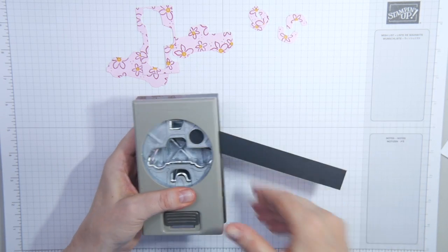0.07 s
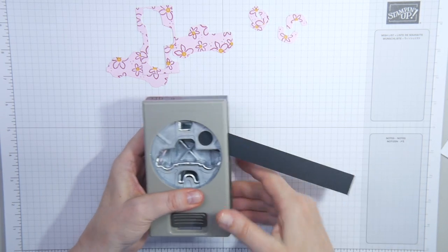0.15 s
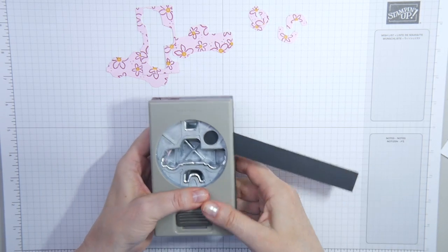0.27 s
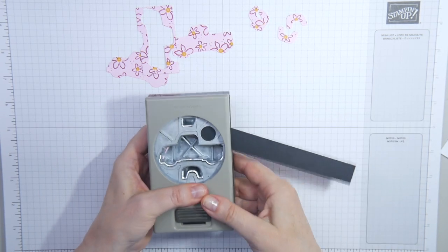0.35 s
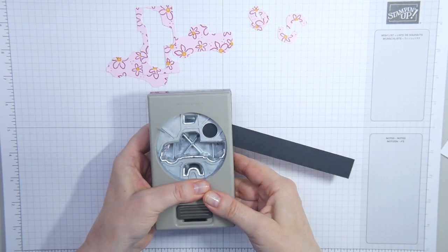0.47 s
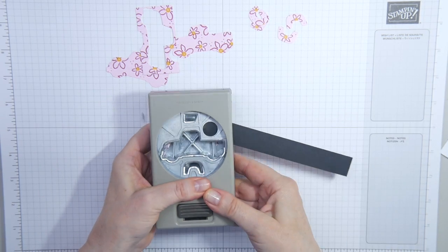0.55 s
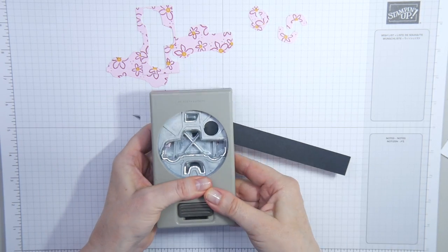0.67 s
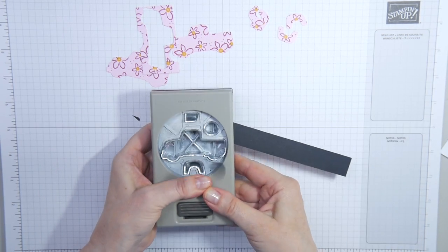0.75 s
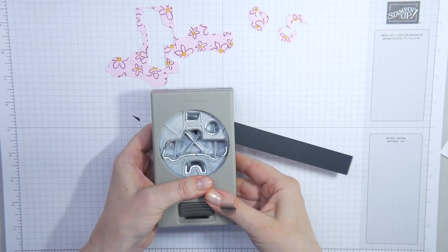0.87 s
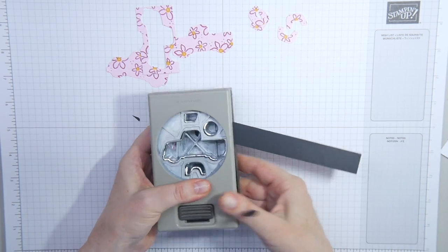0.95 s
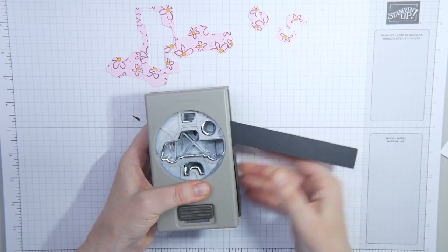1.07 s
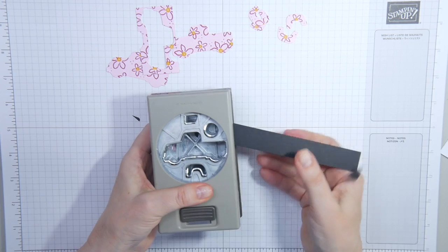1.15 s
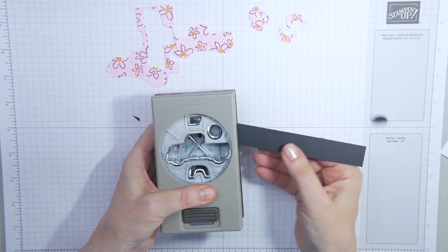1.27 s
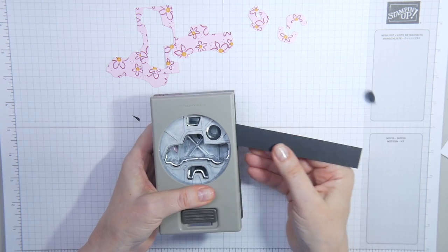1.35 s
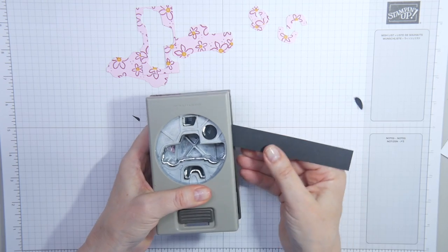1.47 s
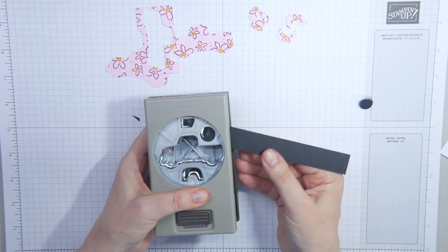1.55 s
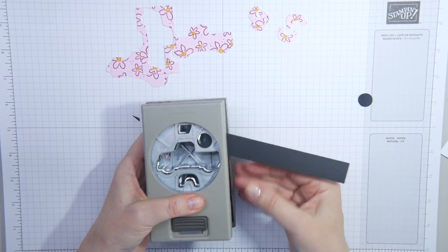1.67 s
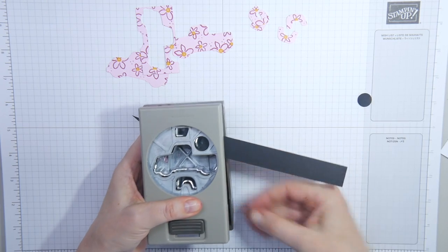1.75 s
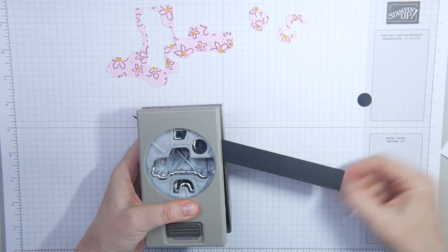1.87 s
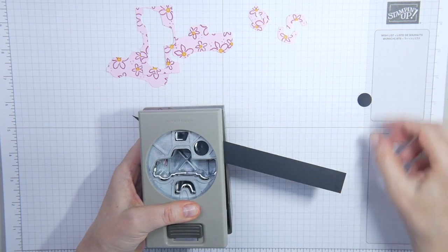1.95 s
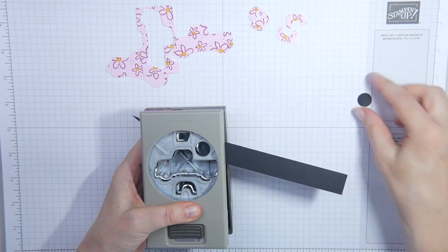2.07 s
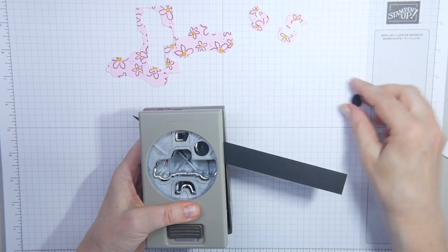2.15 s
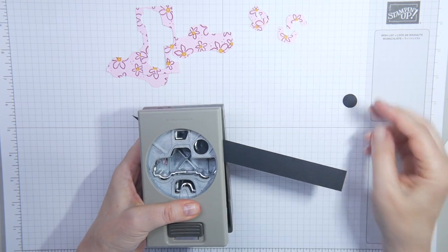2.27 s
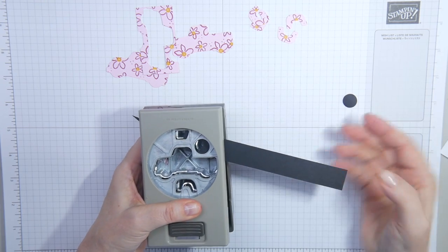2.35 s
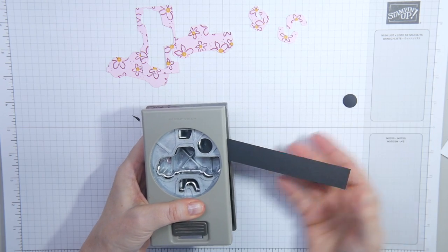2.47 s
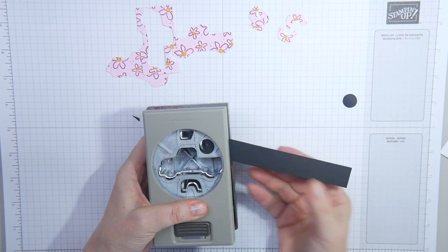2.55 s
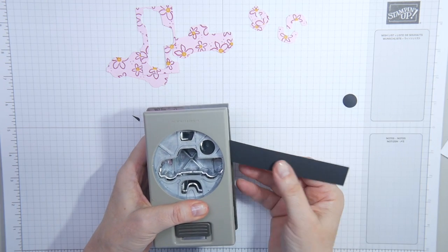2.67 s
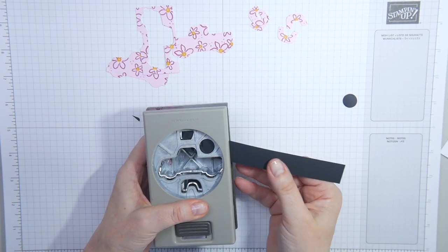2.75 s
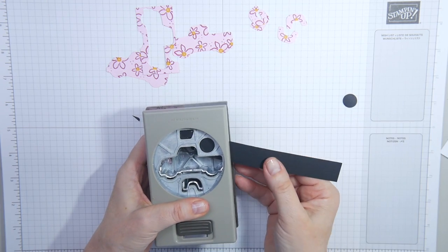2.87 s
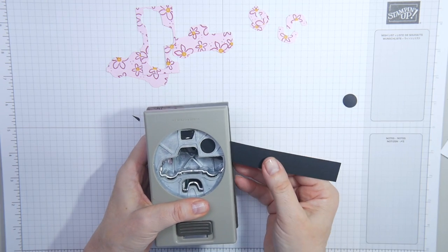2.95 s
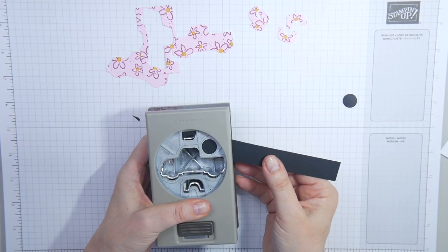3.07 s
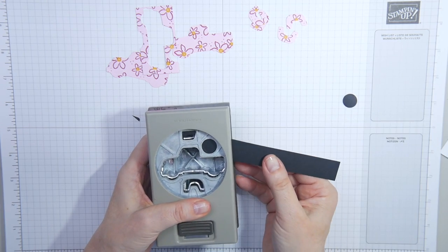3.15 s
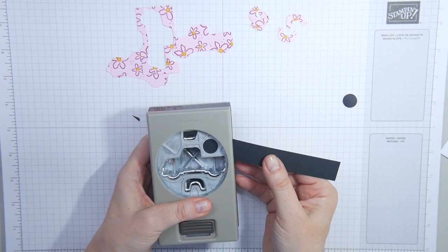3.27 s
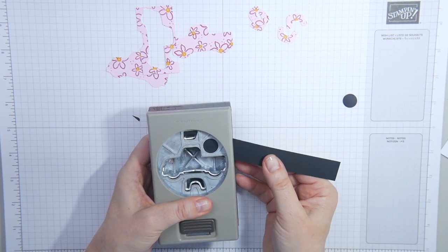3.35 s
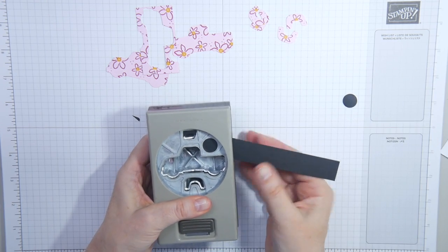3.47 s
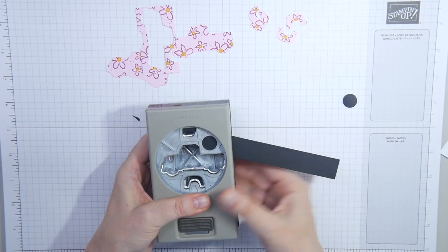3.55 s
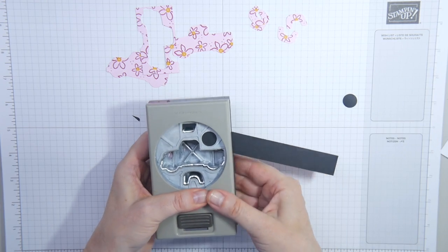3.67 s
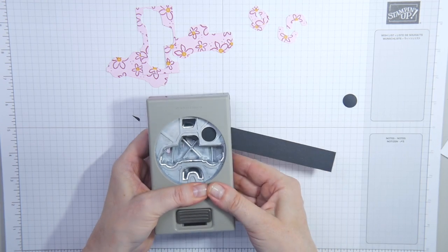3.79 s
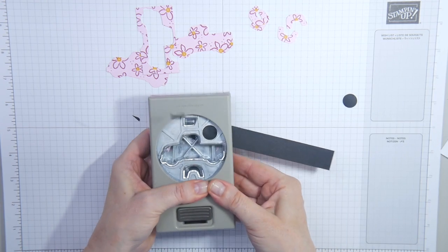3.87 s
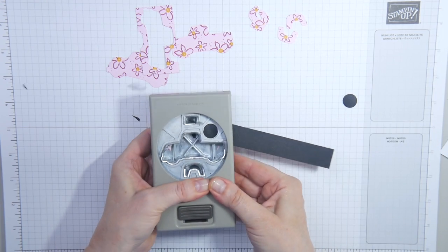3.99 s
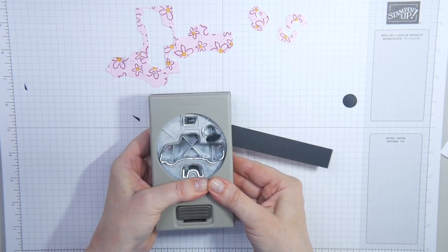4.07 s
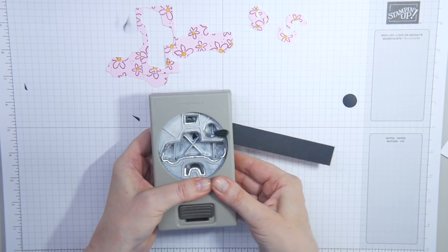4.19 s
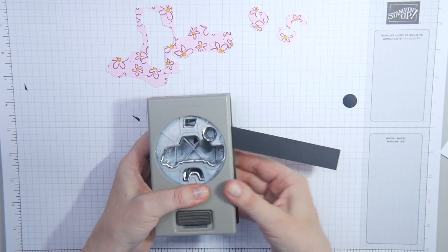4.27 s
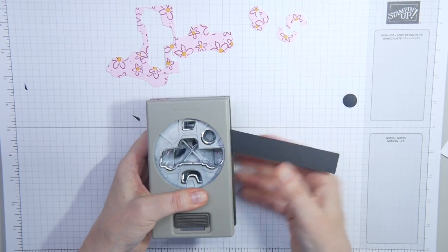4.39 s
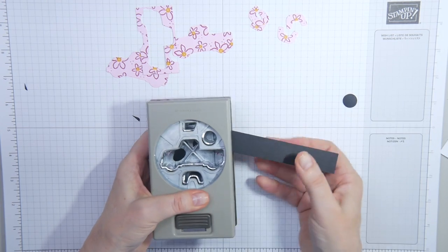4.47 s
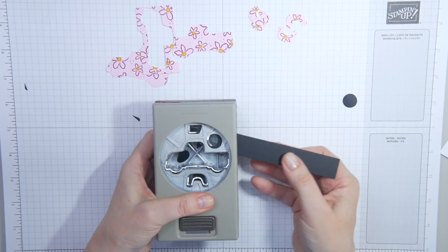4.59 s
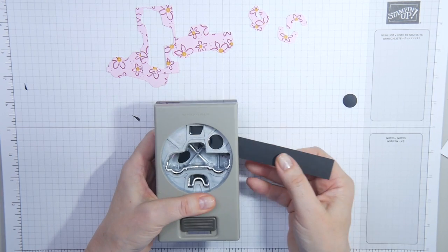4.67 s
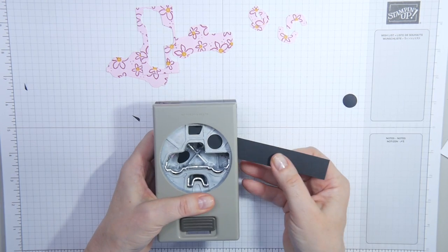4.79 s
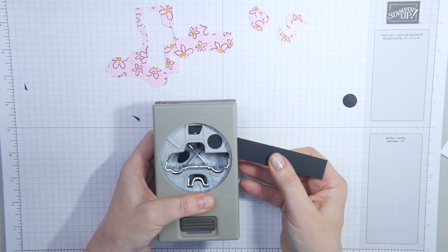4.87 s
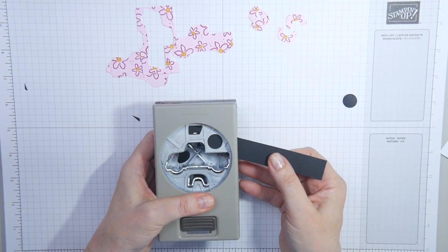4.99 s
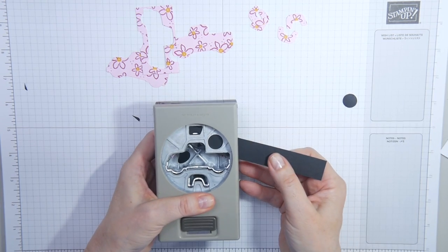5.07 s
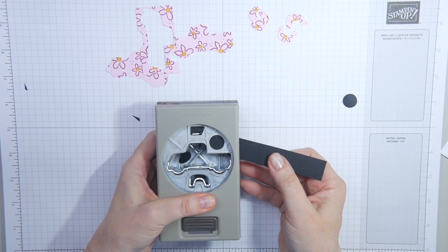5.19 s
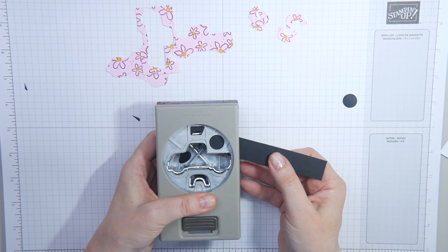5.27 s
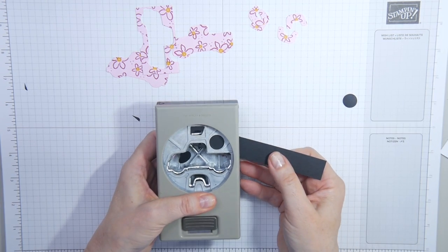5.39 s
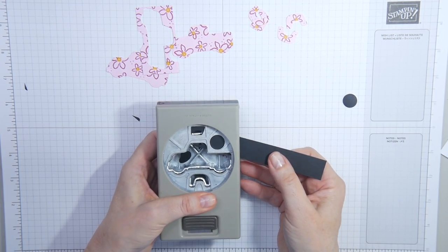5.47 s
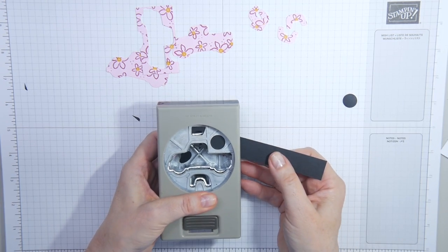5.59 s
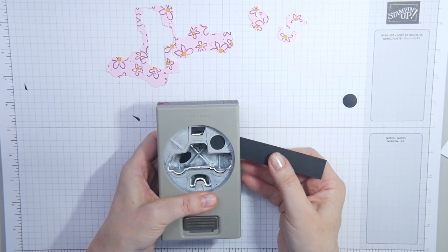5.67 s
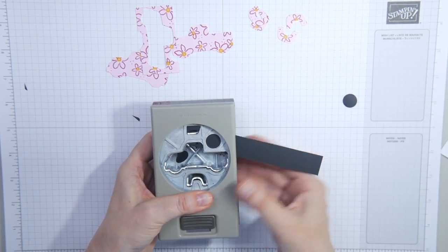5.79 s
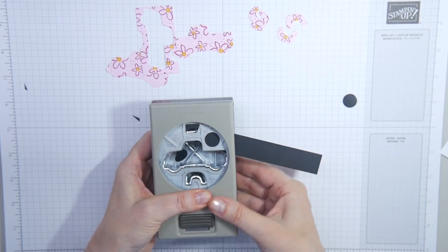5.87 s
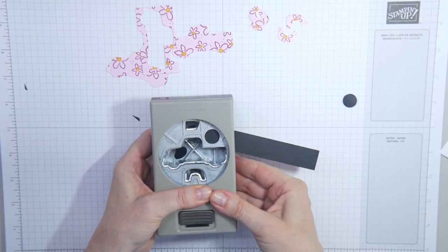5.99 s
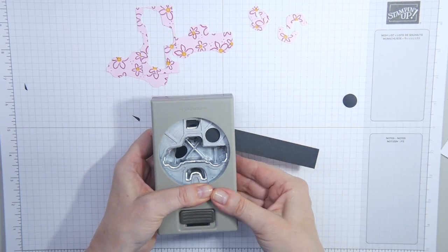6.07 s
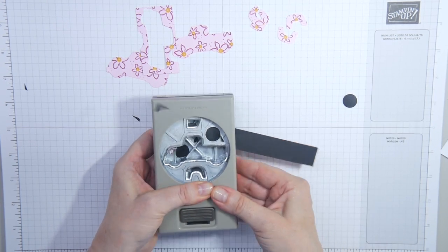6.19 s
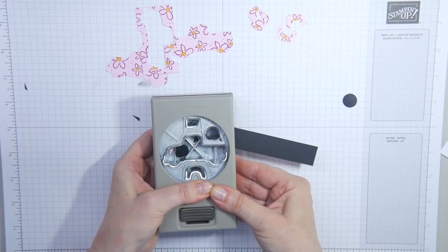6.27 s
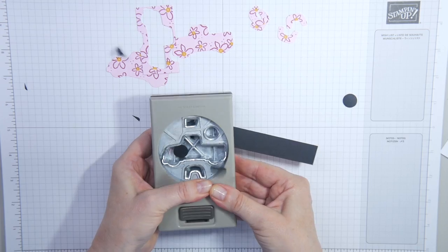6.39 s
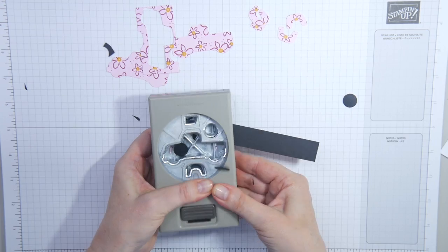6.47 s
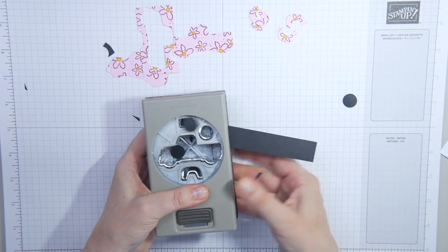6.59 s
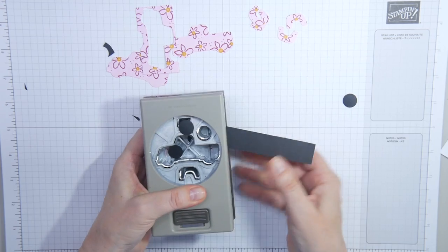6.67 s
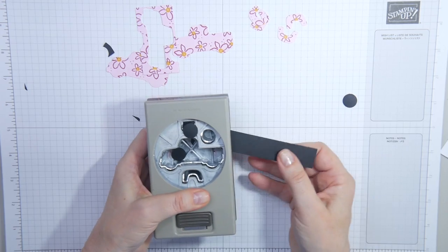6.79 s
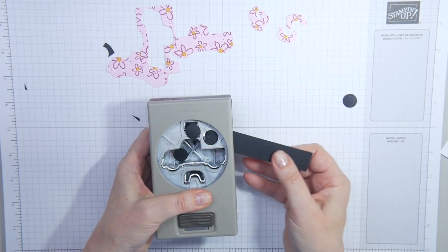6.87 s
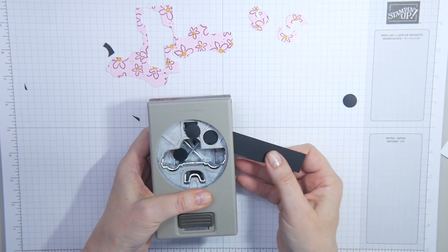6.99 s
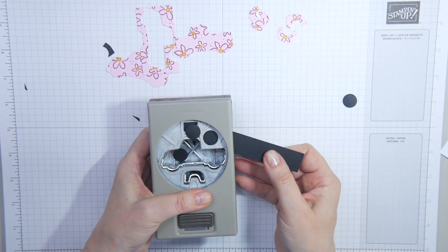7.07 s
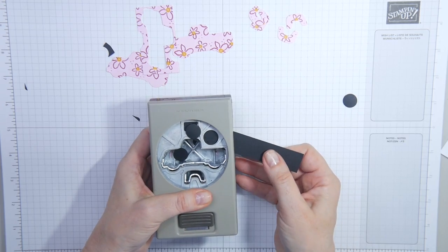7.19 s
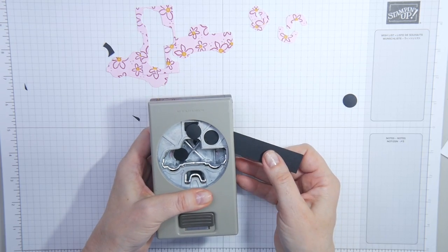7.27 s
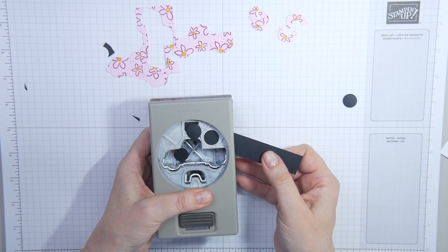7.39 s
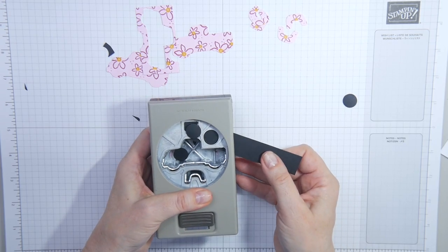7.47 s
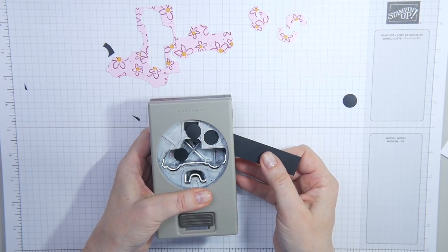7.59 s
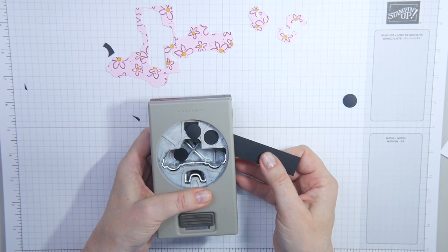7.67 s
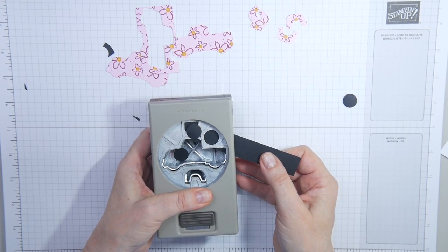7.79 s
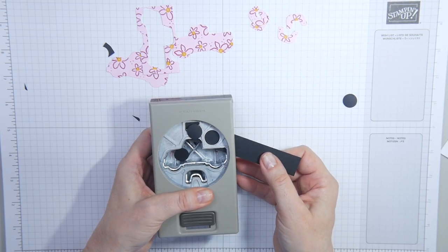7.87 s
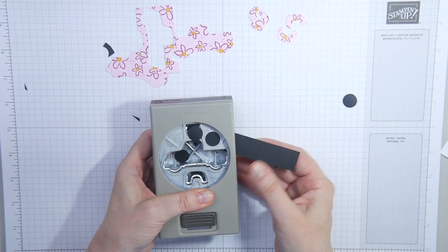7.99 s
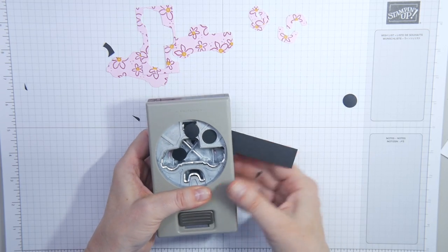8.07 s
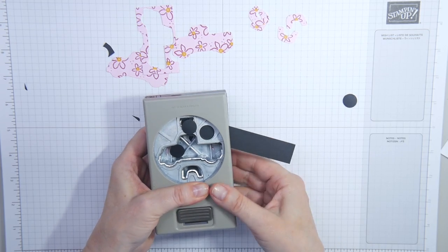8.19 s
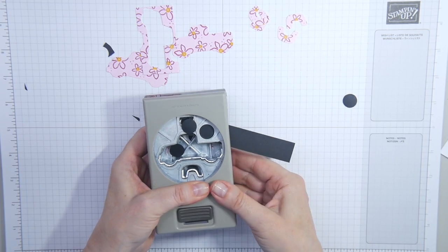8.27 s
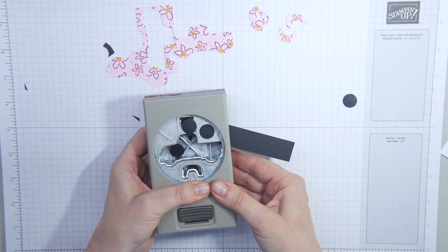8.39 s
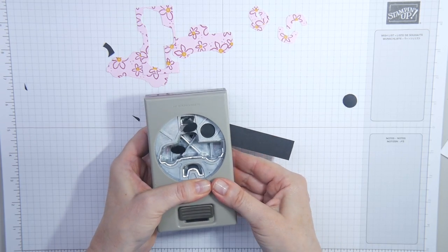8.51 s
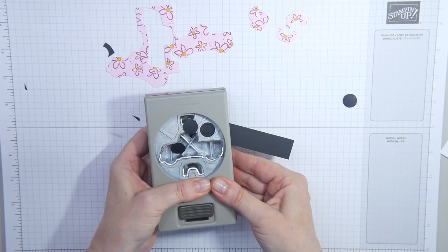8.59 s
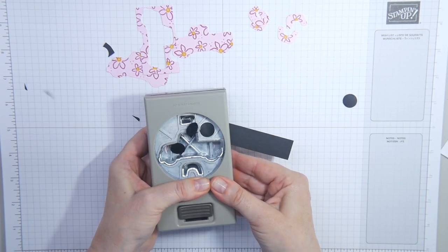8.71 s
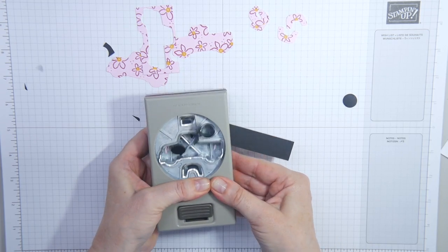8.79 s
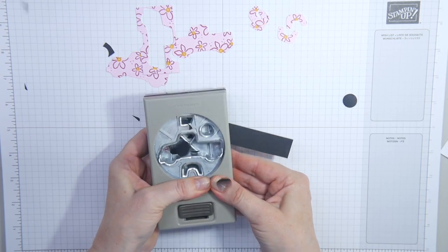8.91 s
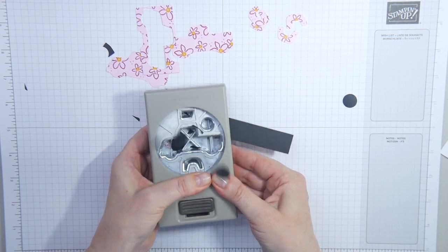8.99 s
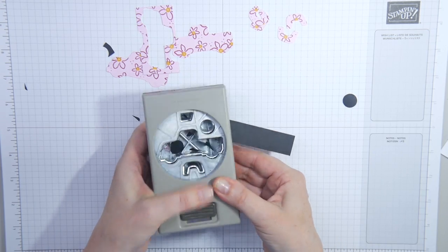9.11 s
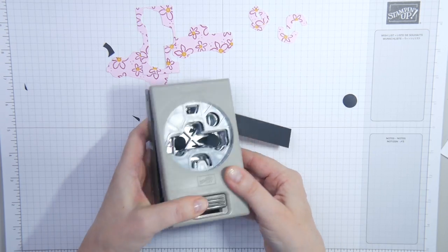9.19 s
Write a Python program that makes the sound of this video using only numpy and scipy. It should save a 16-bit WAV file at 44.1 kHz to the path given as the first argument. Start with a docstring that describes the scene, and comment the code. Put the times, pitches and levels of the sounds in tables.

```python
"""In a small quiet room, above a table, a hand-pressed craft punch cuts four circles from card.
Each press is a few bursts of tiny card fractures exciting the damped modes of housing and die.
Stick-slip noise, filtered by slot, die, skin or slack spring, gives the sliding, scraping and rubbing;
noise bursts give table thumps, decaying partials the spring, shaped noise the still air and faint hum.
A close stereo microphone overloads: a limiter ducks and the highest peaks clip."""
import sys
import numpy as np
from scipy import signal
from scipy.fft import rfft, irfft, next_fast_len
from scipy.io import wavfile
from scipy.ndimage import uniform_filter1d

SR = 44100
rng = np.random.default_rng(int(sys.argv[2]) if len(sys.argv) > 2 else 0)


def bounce(signal):
    """Save signal as a 16-bit WAV file at the path given by the first command-line argument."""
    frames = np.transpose(np.atleast_2d(signal))
    limited = np.clip(frames, -1, 1)
    pcm = np.round(limited * 32767).astype(np.int16)
    wavfile.write(sys.argv[1], SR, pcm)


N = 407484

# Still air and microphone hiss, spectral density: f/Hz, level/dB per Hz
AIR_SPECTRUM = [(15, -49.5), (25, -16), (97, -0.5), (301, -3), (363, -1.5), (439, -4.5), (503, -5.5),
                (734, -7), (1890, -16), (2480, -16), (10100, -27), (14800, -30.5), (16000, -42.5)]
# Left-right likeness of the air: f/Hz, correlation (-1 to 1)
AIR_LIKENESS = [(60, -0.029), (240, -0.62), (950, -0.6), (3770, 0.34), (15000, 1)]
AIR_DB, PATCHY_DB = -56, 1.8  # rms level; rms unevenness over time and frequency
HUM_HZ, HUM_WIDTH_HZ = 361, 40
HUM_DB, HUM_WAVER_DB = -72, 4  # median level; rms waver

# Reverberation of the room: f/Hz, t60/s
ROOM_DECAY = [(300, 0.12), (800, 0.59), (2100, 0.33), (5500, .4), (12000, 0.37)]
# Left-right likeness of the reverberation: f/Hz, correlation (-1 to 1)
ROOM_LIKENESS = [(100, 0.069), (500, 1), (2000, 0.3), (4400, 0.91), (12000, 0.33)]
# Side signal of near sounds: f/Hz, level/dB re mid
SIDE_SPECTRUM = [(100, -1.5), (400, -8.5), (1300, -11), (2400, -19.5), (4400, -19), (8000, -9),
                 (14000, -4.5)]
# Microphone response: f/Hz, level/dB
MIC_RESPONSE = [(25, -14.5), (90, -4), (200, -1.5), (7500, -0.5), (7830, -5.5), (8100, -1), (14000, -1),
                (15000, -3), (16000, -17)]
EDGE_HZ = 16400  # upper band limit

# A hand, the punch or a cut disc meets the table: t/s, thump level/dB, scuff level/dB, t60/s
LANDINGS = [(.194, -39, -66, 0.21), (1.33, -66, -50.5, 0.23), (2.182, -47.5, -62.5, 0.22),
            (3.788, -40.5, -69, 0.5), (8.499, -39, -68, 0.23), (9.09, -46.5, -64, .3)]
# Response of the table top: f/Hz, level/dB
TABLE_RESPONSE = [(60, -15), (130, -2.5), (260, -2.5), (400, -8.5), (800, -42)]
THUMP_RISE_S = 0.0074

# The return spring sings while the lever is held down: start t/s, length/s, level/dB
SPRING_RINGS = [(.45, .32, -66), (3.79, 0.36, -48), (6.03, 0.46, -45.5), (8.56, 0.346, -48),
                (9.13, 0.13, -69)]
# Partials of the held spring: f/Hz, struck level/dB, t60/s, rubbed level/dB
SPRING_PARTIALS = [(838, -1.5, 7.2, 0.5), (1760, -6, 1.5, -3.5), (2385, -1, 1.5, -3.5),
                   (3478, -14, 1.2, -8)]
# The strip is drawn slowly through the punch and stirs the slack spring: start t/s, length/s, level/dB
DRAGS = [(0, 0.42, -63.5), (1.05, 0.9, -59), (3.114, 0.92, -62), (4.361, 0.39, -71), (5.699, 0.35, -62.5),
         (6.897, 0.23, -59.5)]
DRAG_RISE_S, DRAG_FALL_S, DRAG_SKIN_DB = 0.08, 0.03, -1.5
# At rest the spring sounds a little higher: factor on pitch; resonance width as a share of pitch
SLACK_PITCH, SLACK_DAMPING = 1.015, 0.067

# The card strip slips in the slot: strongest moment t/s, level/dB, length/s
SLIPS = [(.02, -71, .12), (.43, -58.5, 0.069), (2.765, -59.5, 0.13), (2.84, -55, 0.033),
         (2.895, -54, 0.052), (2.965, -61, 0.06), (3.075, -60, 0.11), (3.135, -56.5, .05),
         (3.335, -57, .08), (3.67, -65, .1), (3.77, -57, .06), (4.64, -52, 0.03), (4.76, -58.5, 0.12),
         (4.895, -61.5, 0.11), (4.987, -48, 0.056), (5.043, -46, 0.031), (5.375, -58.5, 0.068),
         (5.45, -58, 0.042), (5.61, -60.5, 0.06), (5.78, -62, 0.11), (6.01, -59, 0.062), (6.7, -57.5, 0.19),
         (6.855, -86, 0.096), (7.455, -63.5, 0.087), (7.6, -70.5, .08), (8.01, -48, 0.061),
         (8.35, -58.5, .06), (8.49, -77, .04)]
# The die scrapes in the housing, mostly as the lever comes back: strongest moment t/s, level/dB, length/s
SCRAPES = [(.13, -69, 0.29), (0.364, -61, 0.12), (0.914, -46, .08), (0.987, -37.5, 0.082),
           (1.053, -48.5, 0.085), (3.6, -58, .12), (4.181, -34, 0.042), (4.285, -37, 0.16),
           (4.455, -51, 0.11), (6.464, -41, .1), (6.54, -37, .08), (6.562, -39.5, 0.093),
           (8.125, -55.5, .1), (8.967, -34.5, 0.075), (9.094, -38, 0.12), (9.207, -50.5, 0.052)]
# Fingers rub card, housing or table: strongest moment t/s, level/dB, length/s
RUBS = [(0.068, -66.5, 0.2), (0.234, -63.5, .2), (1.78, -66, 0.31), (2.205, -63, 0.064), (2.483, -66, 0.3),
        (2.831, -65.5, .3), (3.493, -70, 0.071), (3.634, -61, 0.13), (4.697, -67.5, 0.16),
        (5.889, -59, 0.15), (6.58, -60.5, 0.049), (6.703, -64, 0.069), (6.924, -61, 0.083),
        (8.17, -67, .18), (8.282, -72.5, 0.054), (9.116, -75, 0.12)]
# A stroke swells over this share of its length and fades over the rest; level at both ends
RISE_SHARE, ENDS_DB = 0.53, -15
# What each kind of stroke sets sounding: slot level/dB, die level/dB, skin level/dB
SLIP_MIX = (0, -7, -17.5)
SCRAPE_MIX = (-11, -6, -9.5)
RUB_MIX = (-11, -6.5, 8.2)
# Resonances of the card edge in the slot: f/Hz, width/Hz, level/dB
SLOT_RESONANCES = [(2260, 490, -5.5), (1850, 230, -19)]
# Resonances of the scraping die: f/Hz, width/Hz, level/dB
DIE_RESONANCES = [(3586, 350, -6.5), (3930, 700, 0), (5250, 1200, -0.5)]
# Hiss of rubbing skin, spectral density: f/Hz, level/dB per Hz
SKIN_SPECTRUM = [(150, -23), (500, -9.5), (1200, 0), (2500, -2), (5500, -6.5), (7800, -12), (9500, -5.5),
                 (15000, -29.5)]

# Crunches of the die: t/s, peak level/dB, knock level/dB, edge level/dB, length/ms,
# place of the climax (0-1), grip (factor on mode pitch), room level/dB
CRUNCHES = [(0.4381, -8, -22, -11.5, 10, 0.45, 0.81, -5.5), (0.514, -23, -3.5, 5, 7.4, 0.6, 1, -6.5),
            (0.6142, -14, -16.5, -6.5, 10, 0.3, 0.86, -3), (0.6633, -23.5, -6.5, -8, 9.1, .3, 0.91, -11),
            (0.7732, -3, -13.5, -1, 7.54, 0.3, 1.024, -9), (3.781, -16.5, -10, -9.5, 6.2, 0.9, 0.96, -3.5),
            (3.814, -26.5, -17, -17.5, 3.6, 0.3, .97, -6), (3.8289, -10.5, -16.5, -5, 12, 0.56, .95, -6),
            (3.925, -10, -13, -6.5, 7.4, 0.2, .97, -4), (4.1043, -3.5, -8.5, 2.5, 6.36, .08, 1.03, -10),
            (6.0213, -13, -23, -13.5, 7.5, 0.73, .9, -5.5), (6.061, -21, -2, -7.5, 10.5, .05, 1.075, -4.5),
            (6.17, -5, -10.5, -4.5, 7.9, 0.14, .97, -6.5), (6.3545, -3.5, -13, -0.2, 8.5, 0.09, 0.91, -9),
            (6.5904, -30, -37, -13.5, 5.2, 0.23, 0.82, -5), (8.497, -23, -6.5, -8, 4.72, 0.2, 0.98, -4.5),
            (8.5495, -6.5, -11, -3, 9.5, 0.7, 0.95, -6.5), (8.7392, -18, -2.5, -1, 23, 0.35, 0.99, -5),
            (8.872, -3, -12, 2.5, 9, 0.2, 1.007, -10)]
# Small taps of card, fingers and housing: t/s, peak level/dB, thud level/dB, knock level/dB, edge level/dB
TAPS = [(0.1928, -32, 3, 30.5, 9), (1.3209, -33.5, -14.5, 11.5, -3), (1.3288, -37, -7, 16, 3),
        (1.394, -46, -9, 9, -5), (2.1811, -47, 5, 19, 14), (2.7363, -51.5, -23, -20, -5),
        (3.493, -50, -4, -13, -3), (4.4406, -45, -17, -8, 33), (4.523, -48.5, -7, -10.5, 26),
        (4.6341, -52, -19, -21, 8), (4.6638, -52, -18, -18, -4), (4.9744, -54, -30, -39, -5),
        (5.588, -53.5, -23.5, -19, -1), (5.6057, -47, -22, -23.5, -14), (5.9554, -50, -8, 3, -8),
        (6.6756, -43, -21, -16, 22), (6.698, -44, -18, -17.5, -9), (6.8542, -46.5, -7, -10, -2),
        (8.2762, -50, -17, 1.5, 5), (8.3468, -43, -9, -7, -18), (9.0804, -40, -45, -24, 9),
        (9.107, -39.5, -5, -38.5, -7), (9.163, -44, -8, -7, 10), (9.1968, -42.5, -21, -13, 12)]
TAP_MS, TAP_CLIMAX, TAP_GRIP = 2.2, 0.175, 0.96
TAP_ROOM_DB, TAP_LEVER_DB = -6.5, -39.5
# Centres of thud, knock, body, edge and sizzle: f/Hz
PART_CENTRES = [450, 1100, 2300, 4700, 10000]
# Modes of housing and die, strongly damped by the grip: nominal f/Hz, level/dB, longest t60/s
HOUSING_MODES = [(132, -16, 0.07), (240, -10.5, 0.025), (386, -8, 0.047), (518, -2, 0.016),
                 (725, -3.5, 0.0057), (1095, -8.5, .015), (1290, -3.5, 0.02), (1720, -5, 0.0025),
                 (2178, -0.5, 0.0021), (2514, -1.5, 0.018), (3160, -8, 0.0069), (3880, -2, 0.0013),
                 (3736, 1.5, .007), (4710, -6.5, .004), (5070, -4, 0.009), (5610, -2.5, .0025),
                 (7330, -6.5, 0.0023), (7700, 0.5, 0.0014), (8800, -0.5, 0.0009), (9860, 1, 0.0011),
                 (13200, -11, 0.00014)]
# The lever, which rings on after a blow: nominal f/Hz, t60/s
LEVER_PARTIALS = [(930, .22), (1000, .25), (1070, .18)]
LEVER_SAG_PER_S = 0.35  # coefficient in the phase: the pitch itself sinks at twice this rate
THUD_DB, SIZZLE_DB, LEVER_DB = -10, -9.5, -14  # a crunch's thud and lever re knock; sizzle re edge
STRAIN_S = 0.005  # straining ahead of the break


def amp(db):
    """Level to amplitude: twenty decibels are a factor of ten."""
    return 10 ** (np.asarray(db) / 20)


def evened(x):
    """Normalization to unit rms."""
    return x / np.sqrt(np.mean(x ** 2) + 1e-20)


def read(points, hz):
    """Interpolation of a table of (f/Hz, value) on a logarithmic frequency axis."""
    f, value = np.transpose(points)
    return np.interp(np.log(hz + 1), np.log(f + 1), value)


def add(mix, s, sound):
    """Superposition: a sound is added in place from time s."""
    part = mix[round(s * SR):][:len(sound)]
    part += sound[:len(part)]


def pair(a, b, same):
    """Partial coherence: two unrelated spectra become left and right of the given correlation."""
    same = np.clip(same, -1, 1)[:, None]
    mid = np.sqrt((1 + same) / 2) * a
    side = np.sqrt((1 - same) / 2) * b
    return np.array([mid + side, mid - side])


def coloured(x, points):
    """Linear filtering: the spectrum is multiplied by a tabulated response."""
    size = next_fast_len(N + 4096)
    gain = amp(read(points, np.fft.rfftfreq(size, 1 / SR)))
    return irfft(rfft(x, size) * gain, size)[..., :N]


def resonance(hz, f, width):
    """Resonance: a complex response peaks at f and falls off on the scale of its width."""
    return 1 / (1 + 2j * (hz - f) / width) ** 2


def gritty(size, grit_db):
    """Brittle fracture: fibres give way in clicks of very uneven size."""
    unevenness = np.minimum(rng.exponential(1, size), 5)
    return rng.standard_normal(size) * amp(grit_db * unevenness)


def friction(gain, grit_db, slip_db):
    """Stick-slip: gritty noise of fluctuating level excites a given spectrum."""
    slips = evened(uniform_filter1d(rng.standard_normal(N), 200))
    excitation = gritty(N, grit_db) * amp(slip_db * slips)
    return evened(irfft(rfft(excitation) * gain, N))


def air():
    """Broadband noise: the still room and microphone hiss, partly coherent and patchy in level."""
    hz = np.fft.rfftfreq(1024, 1 / SR)
    a, b, c, d = rng.standard_normal((4, 513, N // 256 + 5))
    z = pair(a + 1j * b, c + 1j * d, read(AIR_LIKENESS, hz))
    patches = uniform_filter1d(rng.standard_normal(z.shape[1:]), 10, axis=0)
    patches = evened(uniform_filter1d(patches, 12, axis=1))
    z = z * amp(read(AIR_SPECTRUM, hz)[:, None] + PATCHY_DB * patches)
    noise = signal.istft(z, nperseg=1024, noverlap=768)[1][:, :N]
    return amp(AIR_DB) * evened(noise)


def hum():
    """Narrow-band noise: a resonance selects a faint hum whose level swells and sinks."""
    hz = np.fft.rfftfreq(N, 1 / SR)
    source, drift = rng.standard_normal((2, N))
    band = evened(irfft(rfft(source) * resonance(hz, HUM_HZ, HUM_WIDTH_HZ), N))
    waver = evened(uniform_filter1d(uniform_filter1d(drift, 5000), 5000))
    return amp(HUM_DB + HUM_WAVER_DB * waver) * band


def room(x):
    """Reverberation: sparse echoes of random sign, each band decaying at its own rate."""
    taps = np.zeros((2, SR // 2))
    slots = np.arange(260, SR // 2 - 20, 20)
    at = slots + rng.integers(0, 20, (2, len(slots)))
    np.put_along_axis(taps, at, rng.choice([-1., 1.], at.shape), 1)
    hz, t, z = signal.stft(taps, SR, nperseg=128)
    z = pair(z[0], z[1], read(ROOM_LIKENESS, hz))
    z = z * amp(-60 * t / read(ROOM_DECAY, hz)[:, None])
    z = z * (1 + 0.96 * np.exp(-t / 0.02))  # table and near walls answer first and strongest
    tail = signal.istft(z, SR, nperseg=128)[1]
    return signal.fftconvolve(x[None], tail / np.linalg.norm(tail[0]), axes=1)[:, :N]


def near(x):
    """Early reflection: the two microphone ports hear the near table bounces differently."""
    bounces = rng.standard_normal(130) * np.exp(-np.arange(130) / 62.0)
    bounced = signal.oaconvolve(x, bounces / np.linalg.norm(bounces))[:N]
    side = coloured(bounced, SIDE_SPECTRUM)
    return np.array([x + side, x - side])


def landings():
    """Impact envelopes: thump and scuff levels start suddenly and decay exponentially."""
    levels = np.zeros((2, N))
    t = np.arange(SR // 2) / SR
    for s, thump_db, scuff_db, t60 in LANDINGS:
        rise = np.minimum(t / THUMP_RISE_S, 1)
        add(levels[0], s, amp(thump_db - 60 * t / t60) * rise)
        add(levels[1], s, amp(scuff_db - 60 * t / t60))
    return levels


def table():
    """Plate response: the table top answers with dull noise, partly unlike in the two channels."""
    a, b = (evened(coloured(x, TABLE_RESPONSE)) for x in rng.standard_normal((2, N)))
    return landings()[0] * np.array([a + 0.6 * b, a - 0.6 * b])


def spring():
    """Free vibration: the held spring's thin steady partials decay and are faded out at the end."""
    out = np.zeros(N)
    for s, length, db in SPRING_RINGS:
        t = np.arange(0, length, 1 / SR)
        ring = np.zeros(len(t))
        for f, struck_db, t60, _ in SPRING_PARTIALS:
            ring += amp(struck_db - 60 * t / t60) * np.sin(2 * np.pi * (f * t + rng.random()))
        fade = np.minimum(np.minimum(t, length - t) / 0.017, 1)
        add(out, s, amp(db) * ring * fade)
    return out


def drags():
    """Stick-slip excitation: tiny catches ring the damped slack spring over a dull rustle."""
    t, level = np.arange(N) / SR, np.zeros(N)
    hz = np.fft.rfftfreq(N, 1 / SR)
    for s, length, db in DRAGS:
        rise, fall = (t - s) / DRAG_RISE_S, (s + length - t) / DRAG_FALL_S
        level += amp(db) * np.clip(np.minimum(rise, fall), 0, 1)
    coil = sum(amp(db) * resonance(hz, SLACK_PITCH * f, SLACK_DAMPING * f)
               for f, _, _, db in SPRING_PARTIALS)
    rustle = (hz / 300.0) / (1 + (hz / 650.0) ** 2)
    return level * (friction(coil, 3.5, 3.6) + amp(DRAG_SKIN_DB) * friction(rustle, 1.4, 1.5))


def strokes(rows):
    """Amplitude envelope: each stroke swells to its strongest moment and fades."""
    t, level = np.arange(N) / SR, np.zeros(N)
    for s, db, length in rows:
        part = slice(max(round((s - length) * SR), 0), round((s + 2 * length) * SR))
        before = (s - t[part]) / RISE_SHARE
        after = (t[part] - s) / (1 - RISE_SHARE)
        away = np.maximum(before, after) / length
        level[part] += amp(db + ENDS_DB * away ** 2)
    return level


def handling():
    """Friction-driven resonance: the card edge sings in the slot, the die scrapes, skin hisses broadly."""
    hz = np.fft.rfftfreq(N, 1 / SR)
    envelopes = np.array([strokes(rows) for rows in (SLIPS, SCRAPES, RUBS)])
    slot_level, die_level, skin_level = amp([SLIP_MIX, SCRAPE_MIX, RUB_MIX]).T @ envelopes
    skin_level = skin_level + amp(RUB_MIX[2]) * landings()[1]  # scuffs on landing
    slot, die = (sum(amp(db) * resonance(hz, f, width) for f, width, db in modes)
                 for modes in (SLOT_RESONANCES, DIE_RESONANCES))
    sliding = slot_level * friction(slot, 2.0, 2.9)
    scraping = die_level * friction(die, 2.9, 4.4)
    rubbing = skin_level * friction(amp(read(SKIN_SPECTRUM, hz)), 1.9, 2.2)
    return sliding + scraping + rubbing


def housing_ring(t, part_db, grip):
    """Modal superposition: the impulse response of housing and die is a sum of damped sinusoids."""
    hz, mode_db, t60 = np.transpose(HOUSING_MODES)[:, :, None]
    grip = np.where(hz < 5000, grip, 1)  # fingers reach the housing, not the small steel die
    detuned = grip * hz * (1 + 0.0083 * rng.standard_normal(hz.shape))
    build_up = 1 - np.exp(-t * hz / 1.2)  # each mode builds over a cycle or two
    swing = amp(-60 * t / np.minimum(t60, 14 / hz)) * build_up
    swing = swing / np.linalg.norm(swing, axis=1, keepdims=True)
    swing *= amp(2.5 * rng.standard_normal(hz.shape))  # each blow lands elsewhere
    swing[::2] *= -1  # neighbouring modes in opposition fill the gaps between them
    level = amp(mode_db + read(list(zip(PART_CENTRES, part_db)), hz))
    return (level * swing * np.sin(2 * np.pi * detuned * t)).sum(0)


def lever_ring(t):
    """Free vibration: a few lightly damped partials whose pitch sinks as the lever comes to rest."""
    ring = np.zeros(len(t))
    for f, t60 in LEVER_PARTIALS:
        cycles = f * t * (1.02 - LEVER_SAG_PER_S * t) + rng.random()
        ring += amp(-60 * t / t60) * np.sin(2 * np.pi * cycles)
    return ring * np.minimum(t / 0.024, 1) * np.minimum((t[-1] - t) / 0.05, 1)


def blow(db, part_db, ms, climax, grip, lever_db):
    """Convolution: tiny fractures ring the housing; also returns one ring of equal energy for the room."""
    t = np.arange(9000) / SR
    ring = housing_ring(t, part_db, grip)
    ms_now = (np.arange(1700) / SR - STRAIN_S) * 1000
    u = ms_now / ms
    force = np.interp(u, [0, climax, 1], [0.15, 1, 0.6]) * np.exp(-9.0 * np.maximum(u - 1, 0))
    force *= amp(9 * np.minimum(ms_now, 0))  # the card strains just before it breaks
    sound = signal.fftconvolve(force * gritty(1700, 3.5), ring)
    sound *= amp(db) / np.sqrt(uniform_filter1d(sound ** 2, 180).max())  # peak of the short-time rms
    echo = ring * np.linalg.norm(sound) / np.linalg.norm(ring)
    add(sound, STRAIN_S, amp(db + lever_db) * lever_ring(t))
    return sound, echo


def punch():
    """Impulsive excitation: all crunches and taps, as direct sound and as what is sent to the room."""
    direct, sent = np.zeros(N), np.zeros(N)
    rows = [(s, db, knock + THUD_DB, knock, edge, ms, climax, grip, knock + LEVER_DB, room_db)
            for s, db, knock, edge, ms, climax, grip, room_db in CRUNCHES]
    rows += [(*row, TAP_MS, TAP_CLIMAX, TAP_GRIP, TAP_LEVER_DB, TAP_ROOM_DB) for row in TAPS]
    for s, db, thud, knock, edge, ms, climax, grip, lever_db, room_db in rows:
        part_db = [thud, knock, 0, edge, edge + SIZZLE_DB]
        sound, echo = blow(db, part_db, ms, climax, grip, lever_db)
        add(direct, s - STRAIN_S, sound)
        add(sent, s + ms / 2000, amp(room_db) * echo)  # from the middle of the burst
    return direct, sent


def scene():
    """Superposition: punch and hands, near and through the room, over the still air and the hum."""
    direct, sent = punch()
    hands = handling() + drags()
    close = near(direct + hands + spring())
    reverberant = room(sent + amp(-6.0) * hands)
    return close + table() + reverberant + air() + hum()


def record(dry):
    """Overload: a limiter ducks after loud sound, peaks clip; then microphone colour and band limit."""
    recent_power = uniform_filter1d((dry ** 2).mean(0), 100, origin=49)
    power_db = 10 * np.log10(abs(recent_power) + 1e-12)
    fall = np.arange(N) * 35.0 / SR  # the held level falls at 35 dB/s
    held_db = np.maximum.accumulate(power_db + fall) - fall
    over_db = np.maximum(held_db + 11.0, 0)  # threshold at -11 dB
    ducked = dry / amp(0.44 * uniform_filter1d(over_db, 200, origin=99))
    clipped = coloured(np.clip(ducked, -0.97, 0.97), MIC_RESPONSE)
    low_pass = signal.firwin(511, EDGE_HZ, window=("kaiser", 9), fs=SR)
    return signal.oaconvolve(clipped, low_pass[None], "same")


dry = scene()
out = record(dry)
bounce(out)
```